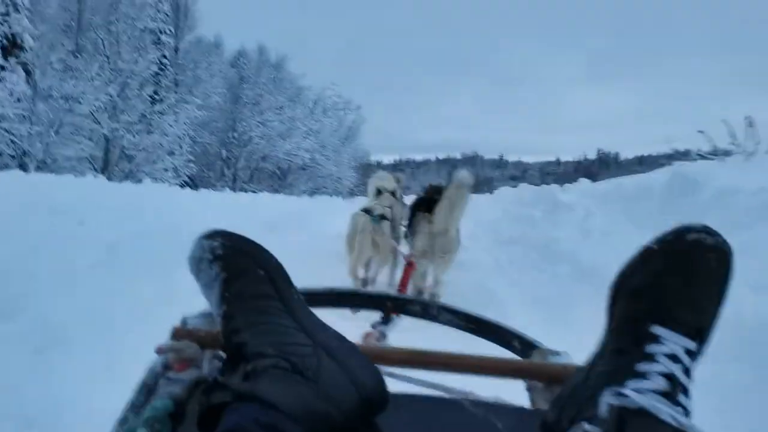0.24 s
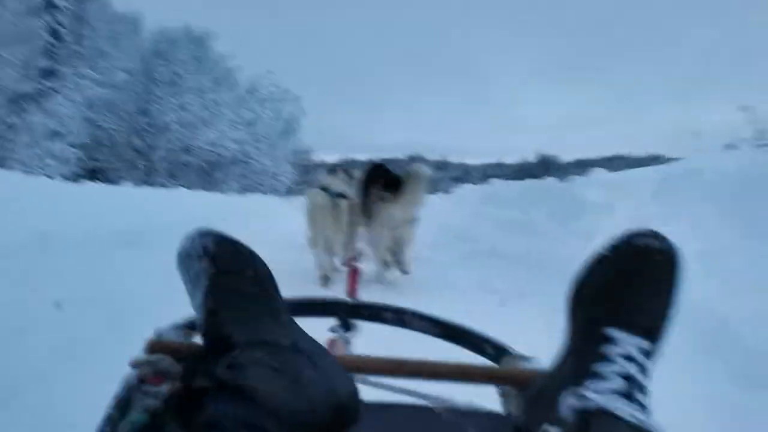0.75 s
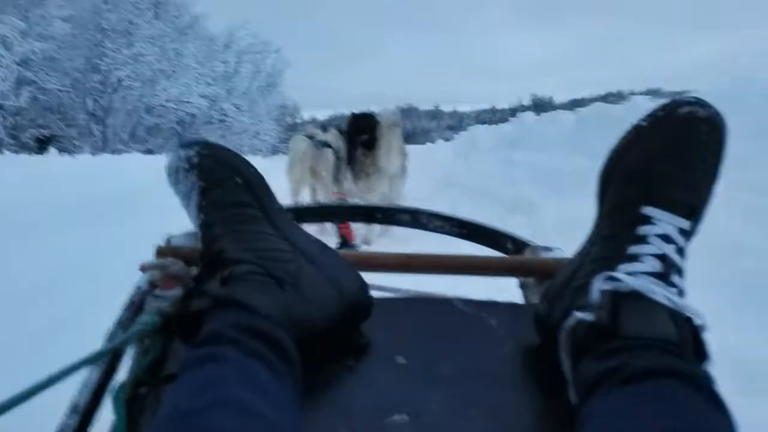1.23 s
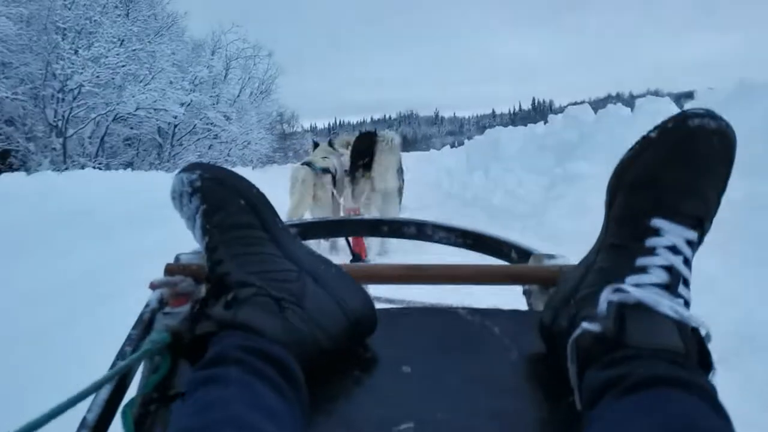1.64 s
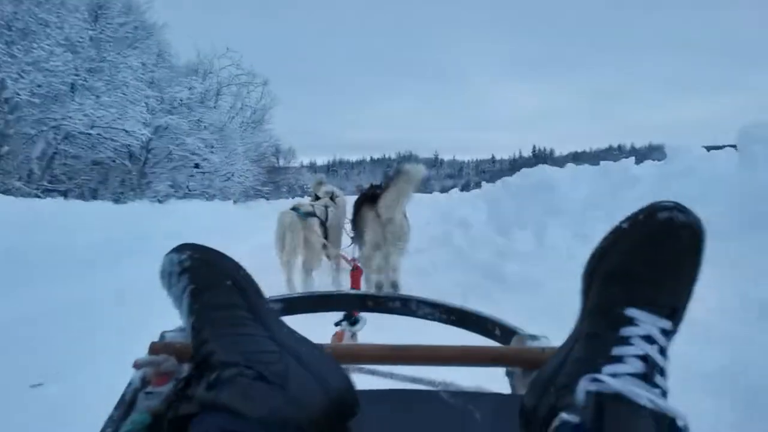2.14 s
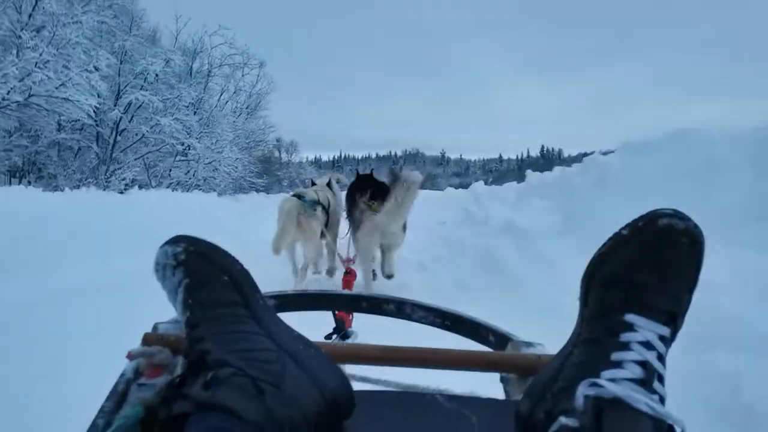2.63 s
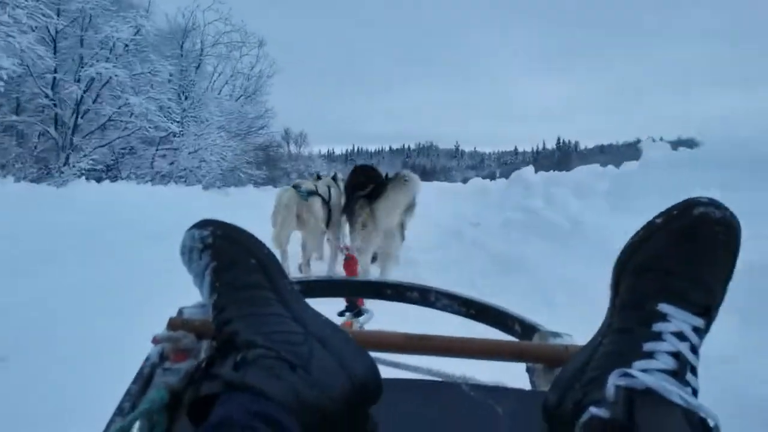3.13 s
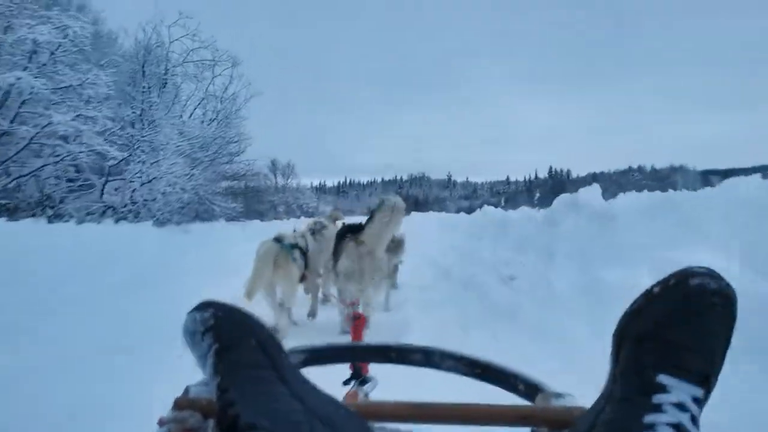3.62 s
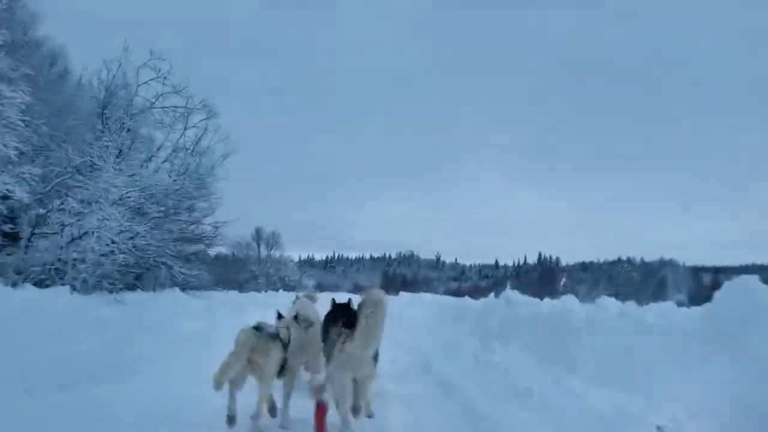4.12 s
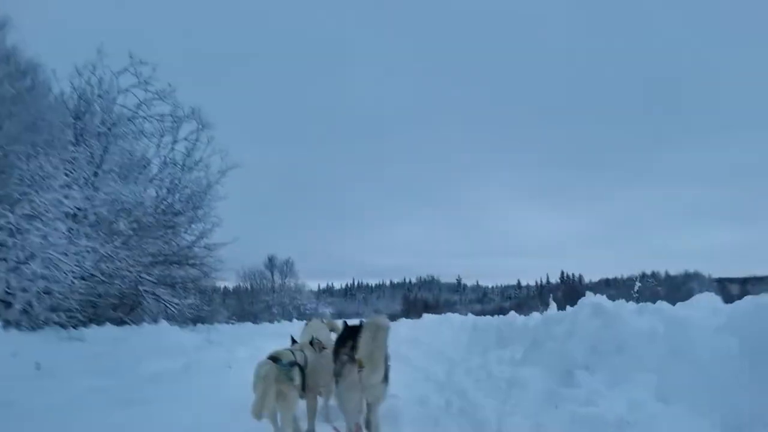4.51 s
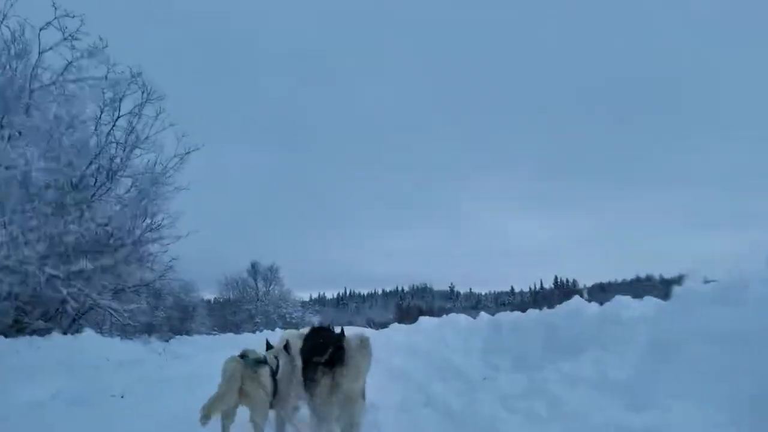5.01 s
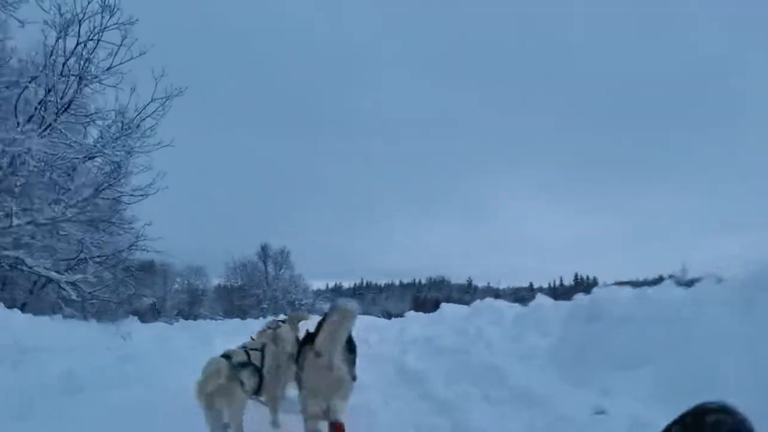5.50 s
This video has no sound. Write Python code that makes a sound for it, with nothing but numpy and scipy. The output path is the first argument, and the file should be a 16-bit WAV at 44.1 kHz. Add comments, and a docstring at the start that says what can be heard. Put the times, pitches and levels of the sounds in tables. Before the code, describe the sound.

Outdoors on a moving dog sled, a low uneven rumble of frame and wind runs throughout. A very hard jolt cracks at half a second; later, loose parts tick and rattle close to the left over faint snow hiss. The stereo microphone rides in the sled.

```python
"""Dog sled on packed snow

A wooden sled slides over packed snow, heard through two microphone ports in its basket.
The frame knocks over lumps and wind buffets each port: both are built from short, low swinging pulses.
Something loose rattles close to the left port: uneven slips and rubbing noise wake its ringing modes.
Snow hisses under the runners as filtered noise and grains; sharp cracks are brief bursts of wide noise."""
import sys
import numpy as np
from scipy import signal
from scipy.io import wavfile
from scipy.ndimage import uniform_filter1d

SR = 44100
rng = np.random.default_rng(int(sys.argv[2]) if len(sys.argv) > 2 else 0)


def store_pcm(level_fs):
    """Save levels as 16-bit WAV."""
    pcm = np.round(np.clip(level_fs, -1, 1) * 32767).astype(np.int16)
    wavfile.write(sys.argv[1], SR, np.atleast_2d(pcm).T)


def volts_from_db(level):
    """Convert decibel levels to linear amplitude ratios."""
    exponent = np.asarray(level, float) / 20
    return 10 ** exponent


N = 253575


def evened(x):
    """Scales a sound to an rms of 1."""
    return x / np.sqrt(np.mean(x ** 2) + 1e-20)


def steadied(x, window_s):
    """Keeps the quick lumps of x but holds its slow level at rms 1."""
    size = round(window_s * SR)
    mono = np.atleast_2d(x).mean(0)
    power = uniform_filter1d(uniform_filter1d(mono ** 2, size), size)
    return x / np.sqrt(abs(power) + 1e-12)


def read(points, hz):
    """Reads a spectrum table on a log-frequency axis."""
    f, value = np.transpose(points)
    return np.interp(np.log(hz + 1), np.log(f + 1), value)


def columns(rows):
    """Turns a table over time into control curves, one value a sample."""
    s, *values = np.transpose(rows)
    return [np.interp(np.arange(N) / SR, s, v) for v in values]


def noise_band(kind, order, hz, x):
    """Filters x with a Butterworth filter of the given kind."""
    return signal.sosfilt(signal.butter(order, hz, kind, fs=SR, output="sos"), x)


def lumpy(rate_hz, depth_db):
    """A gain that wanders at random, mostly slower than rate_hz."""
    slow = noise_band("lowpass", 2, rate_hz, rng.standard_normal(N))
    return volts_from_db(depth_db * evened(slow))


def clicks(per_s, spread_db):
    """A random train of clicks, mostly small, a few large."""
    draw = rng.random((N, 3))
    happens = draw[:, 0] < per_s / SR
    size_db = spread_db * np.minimum(-np.log(draw[:, 2] + 1e-9), 2.5)
    return happens * np.sign(draw[:, 1] - .5) * volts_from_db(size_db)


def knock(hz, cycles):
    """A pulse that swells for the given number of cycles to a peak of 1, then dies more slowly."""
    u = np.arange(round(4 * cycles * SR / hz)) * hz / SR / cycles  # 1 at the peak
    swell = (u * np.exp(1 - u)) ** 1.97
    return swell * np.cos(2 * np.pi * cycles * (u - 1))


def add(mix, s, sound):
    """Mixes in a knock so that its peak, a quarter of the way in, falls at s."""
    start = round(s * SR) - sound.shape[1] // 4
    part = mix[:, start:start + sound.shape[1]]
    part += sound[:, :part.shape[1]]


def both_ports(frame):
    """The frame sound reaches the left port 11 samples later than the right."""
    return np.array([np.roll(frame, 11), frame])


def chatter(blows, fade_s, amount):
    """Follows every blow with a few milliseconds of gritty re-contact."""
    fade = np.exp(-np.arange(600) / SR / fade_s)
    grit = signal.oaconvolve(abs(blows), fade)[:N] * rng.standard_normal(N)
    return blows + amount * grit


def coloured(x, points):
    """Gives x a spectrum with a filter that never sounds ahead of its input (minimum phase)."""
    hz = abs(np.fft.fftfreq(4096, 1 / SR))
    log_gain = read(points + [(15600, -100)], hz) * np.log(10) / 20
    phase = -signal.hilbert(log_gain).imag
    taps = np.fft.ifft(np.exp(log_gain + 1j * phase)).real[:2048]
    return signal.oaconvolve(x, taps / np.linalg.norm(taps))[:N]


# overall loudness of frame and wind: (time [s], level [dB])
RUMBLE_LEVEL = [(0.0, -14.5), (0.2, -18.5), (0.46, -20), (0.51, -13), (0.65, -21.5), (0.925, -28),
                (0.96, -20), (1.16, -19), (1.25, -27), (1.34, -21), (1.58, -22), (1.68, -17.5),
                (1.83, -26.5), (1.94, -20.5), (2.45, -25.5), (2.59, -18.5), (2.96, -25), (3.06, -22.5),
                (3.6, -22.5), (3.66, -23.5), (3.85, -20), (4.05, -27.5), (4.19, -19.5), (5.27, -20),
                (5.37, -25), (5.48, -18.5), (5.74, -18)]
# changing wind: (time [s], brightness, only its changes count [dB], relative lean to the left [no unit])
WIND_CHANGES = [(0.0, -11, -2), (0.47, -21, 0.5), (0.71, -11, 1), (1.15, -6.5, -1), (1.83, -17, 0),
                (2.16, -11, -6), (2.6, -18.5, 5.5), (2.71, -5, 4), (2.91, -15, -7.5), (3.5, -14.5, 4),
                (3.79, -19.5, 1), (4.09, -12, -5), (4.5, -15, 2.5), (4.95, -12.5, -2), (5.1, -7, -9.5),
                (5.35, -9, -6.5), (5.52, -10, 0), (5.74, -14.5, -4)]


def rumble():
    """Frame knocks shared by the ports and wind of their own, held together at one loudness curve."""
    level_db, = columns(RUMBLE_LEVEL)
    bright_db, lean = columns(WIND_CHANGES)
    both = both_ports(frame_knocks(bright_db)) + wind_gusts(bright_db, lean)
    return steadied(both, window_s=0.16) * volts_from_db(level_db)


def frame_knocks(bright_db):
    """The wooden frame knocks low and often, taking the share of each pitch that the wind leaves."""
    return thuds(2.6, 1.91, lumpy(20.8, 2.8), lambda hz: 1 - wind_share(hz), bright_db)


def wind_gusts(bright_db, lean):
    """Wind buffets each port on its own, as unrelated trains of low knocks with a slow throb."""
    gusts = np.array([thuds(3.86, 1.37, lumpy(8.6, 6.36), wind_share, bright_db) for port in range(2)])
    return gusts * volts_from_db(1.59 * np.outer([1, -1], lean))


# how much of the low sound's power is wind: (pitch [Hz], share [0-1])
WIND_PART = [(40, 1), (100, 0.72), (200, 0.36), (350, 0.31), (700, 0.93)]


def wind_share(hz):
    """The part of the power at one pitch that is wind."""
    return np.clip(read(WIND_PART, hz), 0, 1)


# relative colour of the knocks and gusts: (pitch [Hz], density [dB per Hz])
LOW_COLOUR = [(12, -43), (20, -10), (102, -1), (168, 1), (231, -4), (302, -9), (423, -13), (592, -26),
              (915, -35.5), (1100, -38), (1430, -68), (2420, -120)]


def thuds(spread_db, cycles, throb, share, bright_db):
    """Overlapping knocks at 15 low pitches; those around 430 Hz follow the brightness most."""
    per_s = 80  # at 150 Hz; higher pitches knock more often
    out = np.zeros(N)
    jolts = clicks(.6 * per_s, spread_db)  # these shake all pitches at once
    for hz in np.geomspace(25, 900, num=15):
        own = clicks(per_s * np.sqrt(hz / 150), spread_db)
        train = (own + 1.1 * jolts) * throb
        shape = knock(hz, cycles)
        band = evened(signal.oaconvolve(train, shape)[len(shape) // 4:][:N])
        follow = np.exp(-(np.log2(hz / 430) / 2.16) ** 2)
        tilt_db = follow * (bright_db - bright_db.mean())
        # bands widen with pitch, hence the factor hz
        out += band * volts_from_db(read(LOW_COLOUR, hz) + tilt_db) * np.sqrt(hz * share(hz))
    return out


# hard lumps under the runners: (time of the thud's peak [s], peak level [dB], pitch [Hz])
LUMPS = [(0.165, -7, 203), (0.285, -7, 200), (0.488, -4.5, 119), (0.506, 2.5, 131), (0.57, -5, 182),
         (0.952, -3, 111), (1.149, -13.5, 219), (1.177, -7, 207), (1.335, -16.5, 197), (1.452, -14.5, 163),
         (1.654, -9, 216), (2.026, -10.5, 182), (2.852, -12.5, 120), (3.006, -15, 109), (3.061, -12, 109),
         (3.111, -12.5, 128), (3.176, -8, 108.5), (3.277, -12.5, 172), (3.326, -14, 193), (3.657, -7, 118),
         (3.721, -11, 126), (3.779, -7, 170), (3.853, -10.5, 103), (4.175, -6.5, 104), (4.509, -7, 197),
         (4.634, -9.5, 144), (4.983, -9, 113), (5.425, -7, 200), (5.471, -7, 224), (5.496, -5, 228),
         (5.552, -7.5, 193), (5.677, -12.5, 182)]


def bumps():
    """Each lump gives a thud of about 10 ms, then a short ring of the frame at two pitches."""
    out = np.zeros((1, N))
    for s, peak_db, hz in LUMPS:
        add(out, s, -volts_from_db(peak_db) * knock(hz, 0.0057 * hz)[None])  # peaks after 5.7 ms
        add(out, s + 0.0156, volts_from_db(peak_db - 16.0) * knock(174, 1.5)[None])
        add(out, s + 0.01617, volts_from_db(peak_db - 21) * knock(428.4, 3.55)[None])
    return both_ports(out[0])


# sharp pops of wind: (time of the peak [s], peak level averaged over the ports [dB], lean to the left [dB])
WIND_POPS = [(0.168, -13.5, -11), (0.504, -8.5, -11), (1.156, -11.5, 10), (1.333, -12.5, -2),
             (2.189, -16, -24), (4.109, -16, -27), (4.641, -12.5, -24), (4.979, -10.5, 6),
             (5.029, -12, -31), (5.414, -12, -40), (5.647, -17, -27), (5.674, -12, -23.5)]


def pops():
    """A pop of wind is a couple of quick cycles, shared between the ports by its lean."""
    out = np.zeros((2, N))
    for s, peak_db, lean_db in WIND_POPS:
        sides = 2 / (1 + volts_from_db(lean_db * np.array([[-1], [1]])))
        add(out, s, volts_from_db(peak_db) * sides * knock(393, 0.8))
    return out


# ringing modes of the loose part: (pitch [Hz], width [Hz], relative level [dB])
RATTLE_MODES = [(1260, 1200, -2.5), (2000, 300, 3.5), (2400, 250, 1), (2855, 170, 7), (3216, 200, 3.5),
                (3720, 140, 6), (5170, 1100, -3), (5915, 400, 1), (6390, 260, 5), (6900, 500, 5),
                (7550, 500, 5), (8460, 2300, -6)]
# clear ticks of the loose part and of ice: (time [s], relative strength at left [dB], relative lean left [dB])
CLEAR_TICKS = [(0.486, -25, 0), (0.503, -20, 4), (0.569, -24, 1), (1.0817, -20.5, 6), (1.331, -44, 3),
               (1.874, -18.5, 2), (2.142, -31, 12), (2.1607, -18, 3), (2.4143, -25, 29), (2.4431, -14, 14),
               (2.585, -24.5, 26), (2.6958, -19, 15), (2.91, -22.5, 17), (2.7172, -18, 7),
               (2.7915, -16.5, 14.5), (3.1143, -21, 22), (3.3013, -20, 12), (3.584, -14.5, 21),
               (3.6235, -16.5, 23), (3.65, -19, 14), (3.677, -12, 14), (3.774, -17, 8), (3.8135, -20.5, 14),
               (3.8556, -17, 9), (3.904, -21, 0), (3.9916, -26, 16), (4.146, -20.5, 9), (4.1707, -18, 14),
               (4.349, -14, 14), (4.3973, -13.5, 11), (4.819, -17.5, 17), (5.069, -25, 16),
               (5.1387, -20, 10), (5.1654, -14, 13), (5.223, -18.5, 10), (5.284, -20, 15),
               (5.3273, -19.5, 15)]
# colour of the treble at the right port, snow hiss and far rattle alike: (pitch [Hz], density [dB per Hz])
RIGHT_COLOUR = [(500, 13), (1000, 2.5), (2500, 1), (4200, -3.5), (5200, 0), (5800, -11), (7000, -2),
                (8800, -2.5), (9900, -15), (15000, -30.5)]


def loose_part():
    """Slips, rubs and ticks ring the modes at the left port; the right hears blows and a faint leak."""
    shake = shaking()
    blows = 0.42 * shake * steadied(slips(), window_s=0.023)
    rubs = rubbing(shake)
    whole = ring(RATTLE_MODES)
    size = np.linalg.norm(whole)

    tick_s, tick_db, lean_db = np.transpose(CLEAR_TICKS)
    at = np.round(tick_s * SR).astype(int)
    ticks = np.zeros((2, N))
    ticks[:, at] = volts_from_db([tick_db, tick_db - lean_db]) * size / abs(whole).max()

    rattle = np.zeros(N)
    for modes in (RATTLE_MODES[:3], RATTLE_MODES[3:7], RATTLE_MODES[7:]):
        # the contact wanders, so low and high modes are woken unequally from moment to moment
        uneven_blows = blows * volts_from_db(1.65 * rng.standard_normal(N))
        drive = chatter(uneven_blows, 0.0021, 0.18) + rubs * rng.standard_normal(N)
        struck = chatter(0.6 * ticks[0], 0.0032, 0.21)
        for k, mode in enumerate(modes):
            squeak = (-1) ** k * (drive * lumpy(12, depth_db=2.2) + struck)
            rattle += signal.oaconvolve(squeak, ring([mode]))[:N] / size
    rattle = noise_band("lowpass", 3, 9600, rattle)

    far_blows = chatter(blows * volts_from_db(-12.5) + 0.9 * ticks[1], 0.0028, 0.23)
    leak = volts_from_db(-20) * np.roll(rattle, 8)  # 8 samples later
    return np.array([rattle, coloured(far_blows, RIGHT_COLOUR) + leak])


def ring(modes):
    """The summed decay of some modes after one blow; wider modes die sooner."""
    t = np.arange(600) / SR
    out = np.zeros(600)
    for k, (hz, width, db) in enumerate(modes):
        decay = np.exp(-np.pi * width * t)
        out += volts_from_db(db) * decay * np.sin(2 * np.pi * hz * t) * np.sqrt(width) * (-1) ** k
    return out


# bouts of rattling: (start [s], length [s], relative strength at the end [dB], swell during the bout [dB])
RATTLE_BOUTS = [(0.0, 0.0073, -32, 11), (0.49, 0.046, -52.5, -2.5), (0.795, 0.35, -38.5, 5),
                (1.961, 0.071, -31, 6.5), (2.197, 0.21, -26.5, 8), (2.578, 0.31, -34.5, 3.5),
                (3.148, 0.19, -45.5, -8.5), (3.603, 0.098, -27.5, 16.5), (3.807, 0.1, -28.5, 7),
                (3.962, 0.076, -34, 1.5), (4.058, 0.02, -32.5, -10), (4.167, 0.09, -35, -8.5),
                (4.234, 0.22, -37, -1), (4.488, 0.13, -26, 10), (4.801, 0.054, -40.5, 6.5),
                (4.886, 0.077, -34.5, 3.5), (5.093, 0.062, -37.5, -1), (5.184, 0.095, -38, 1),
                (5.347, 0.036, -31, -4.5), (5.393, 0.083, -34, -9.5), (5.631, 0.063, -36, 0)]


def shaking():
    """How hard the loose part shakes: a faint idle, and bouts that start fast, change and stop short."""
    rise_s, stop_s = 0.0024, 0.018
    t = np.arange(N) / SR
    power = (volts_from_db(-47) * lumpy(11, depth_db=2.5)) ** 2  # the idle between bouts
    for start, length, end_db, swell_db in RATTLE_BOUTS:
        left = np.clip(1 - (t - start) / length, 0, 1)  # part of the bout still to come
        rise = np.clip((t - start) / rise_s, 0, 1)
        stop = np.exp(-np.maximum(t - start - length, 0) / stop_s)
        power = power + (rise * stop * volts_from_db(end_db - swell_db * left)) ** 2
    return np.sqrt(power)


def slips():
    """The loose part sticks and slips: clicks at uneven but not wholly random gaps."""
    per_s, jitter = 95, .6  # mean rate; spread of the log gaps
    draw = rng.standard_normal((round(2 * per_s * N / SR), 2))
    gaps = np.exp(jitter * draw[:, 0] - jitter ** 2 / 2) * SR / per_s
    at = np.cumsum(gaps).astype(int)
    out = np.zeros(N)
    out[at[at < N]] = volts_from_db(3.0 * draw[at < N, 1])
    return out


def rubbing(shake):
    """Strength of the rub, in short clumps that crowd into a rasp when the shake is strong."""
    crowd = (shake / volts_from_db(-34)) ** 2  # reaches 1 at a shake of -34 dB
    clumps = contacts(45 * (1 + crowd), fade_s=.004, steady=.1 * (1 + 2 * crowd))
    return 0.57 * shake * steadied(clumps, window_s=0.031)


def contacts(per_s, fade_s, steady):
    """A gain that jumps at each new contact and dies away, over a steady part."""
    fade = np.exp(-np.arange(3000) / SR / fade_s)
    return steady + signal.oaconvolve(abs(clicks(per_s, 0.96)), fade)[:N]


# sharp wideband cracks, the strong one from the input overloading at the hardest jolt:
# (start time [s], noise level at the start [dB])
SHARP_CRACKS = [(0.5046, -25), (0.978, -40)]


def cracks():
    """A crack is about a millisecond of wide noise, bright to the top."""
    out = np.zeros((2, N))
    fade = np.exp(-np.arange(400) / SR / 0.0007)
    for s, start_db in SHARP_CRACKS:
        at = round(s * SR)
        out[:, at:at + 400] += volts_from_db(start_db) * fade * rng.standard_normal(400)
    return out


# loudness of the snow hiss at the right port: (time [s], level [dB])
HISS_LEVEL = [(0.0, -40), (0.2, -45.5), (0.44, -48.5), (0.5, -40.5), (0.75, -46), (0.97, -42.5),
              (1.49, -44), (1.79, -48.5), (2.15, -42.5), (2.52, -48), (2.74, -41.5), (2.96, -47),
              (3.55, -46.5), (3.75, -46.5), (3.97, -51), (4.19, -41), (4.61, -43), (4.75, -46),
              (4.95, -43.5), (5.2, -51), (5.42, -42), (5.74, -44.5)]
# colour of the snow hiss at the left port: (pitch [Hz], density [dB per Hz])
LEFT_COLOUR = [(500, 12), (1000, 7.5), (2500, 7.5), (3600, 4.5), (5200, -5.5), (7400, 2), (8500, -10),
               (10000, -23), (15000, -33)]


def snow_hiss():
    """Crystals crush in small clumps, so the hiss flickers at both ports together."""
    level = volts_from_db(columns(HISS_LEVEL)[0])
    crush = lumpy(38, 1.45)
    left = coloured(level * volts_from_db(4.5) * crunch(crush), LEFT_COLOUR)
    right = coloured(level * crunch(crush), RIGHT_COLOUR)
    return np.array([left, right])


def crunch(crush):
    """Noise and crystal grains; each band of the scrape wanders on its own, so the colour keeps changing."""
    out = np.zeros(N)
    edges = np.geomspace(500, 16000, num=6)
    for lo, hi in zip(edges, edges[1:]):
        grains = evened(chatter(clicks(260, 3.6), 0.0013, 0.22))
        raw = rng.standard_normal(N) + 0.66 * grains
        out += noise_band("bandpass", 2, (lo, hi), raw * lumpy(22, 3.0))
    return evened(crush * lumpy(7.2, 1.5) * out)


def scene():
    """Rumble, lumps, pops, rattle, cracks and snow hiss together."""
    return rumble() + bumps() + pops() + loose_part() + cracks() + snow_hiss()


def roll_off(x):
    """The treble ends steeply here."""
    return signal.sosfilt(signal.butter(12, 15600, fs=SR, output="sos"), x)


def record(dry):
    """The input overloads at 0.98 of full scale, which flattens the hardest jolt."""
    mix = np.clip(dry, -.98, .98)
    return roll_off(mix)


dry = scene()
out = record(dry)
store_pcm(out)
```